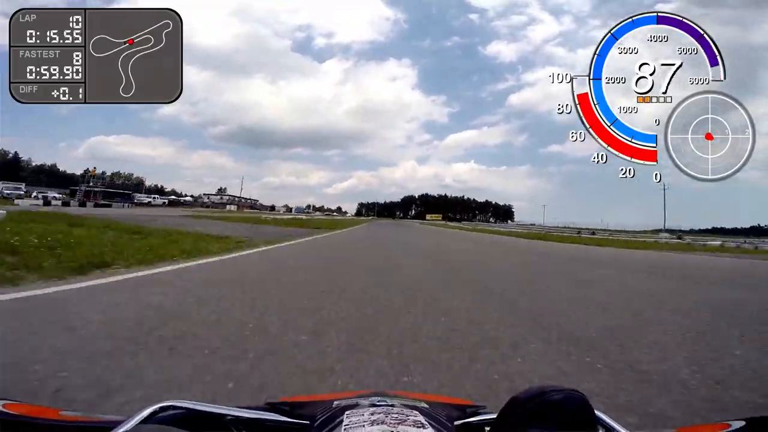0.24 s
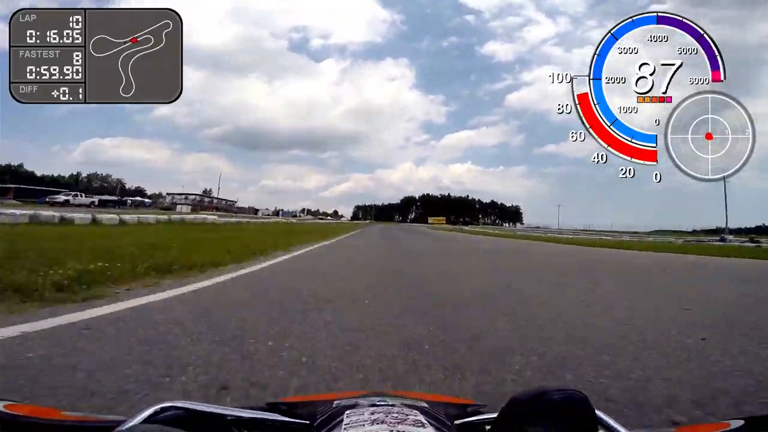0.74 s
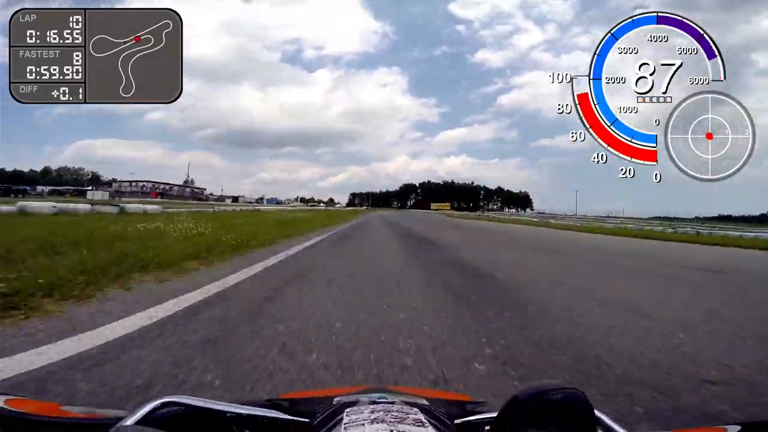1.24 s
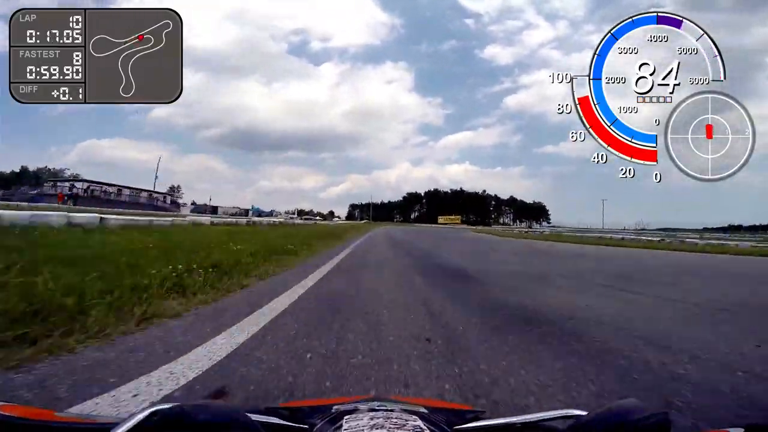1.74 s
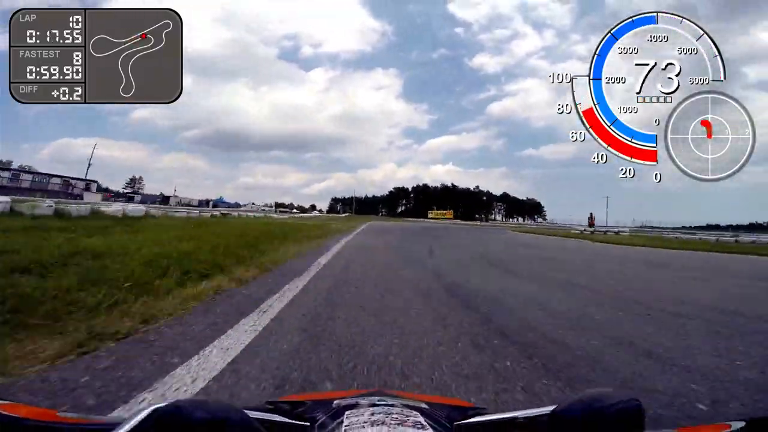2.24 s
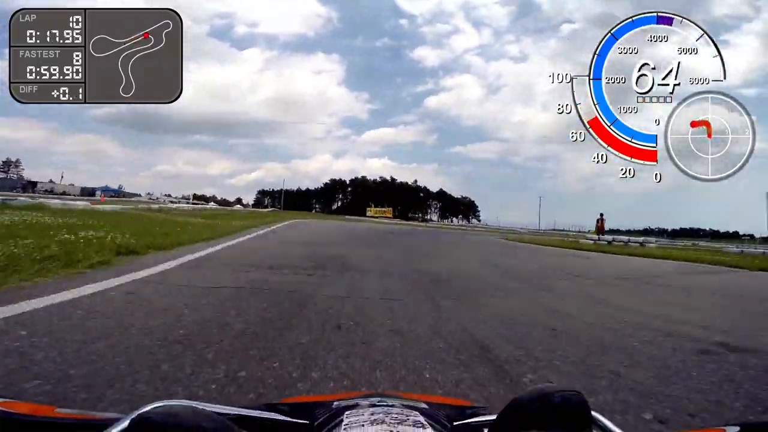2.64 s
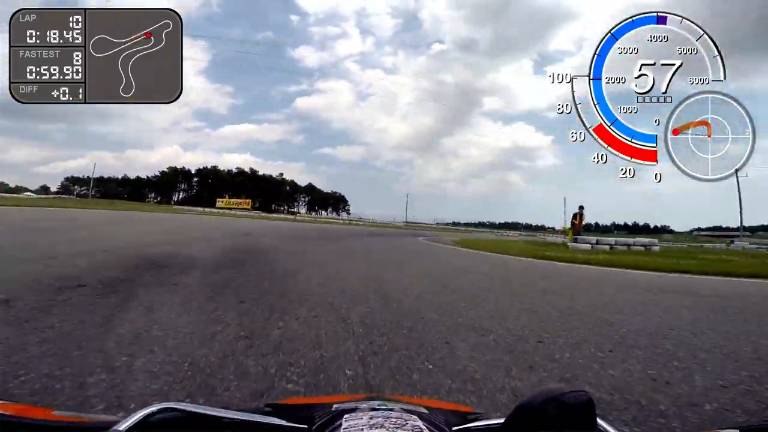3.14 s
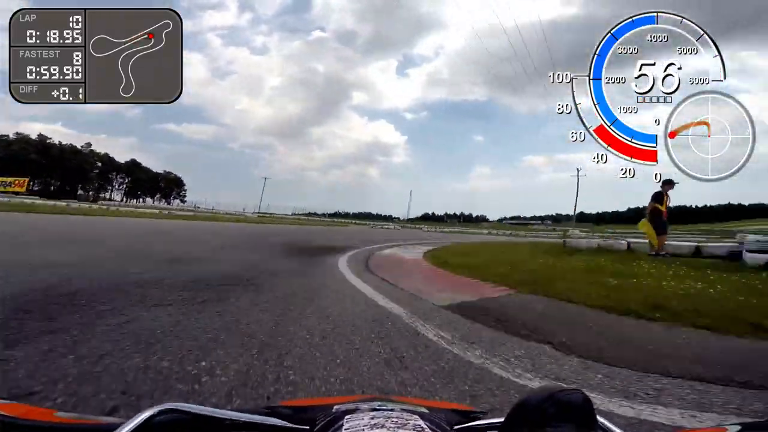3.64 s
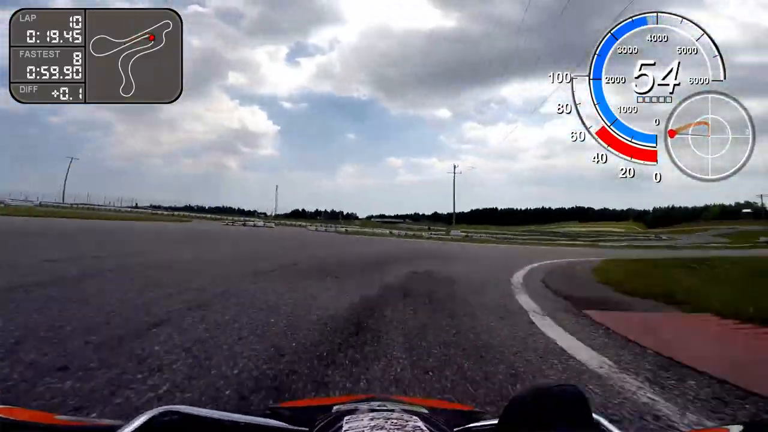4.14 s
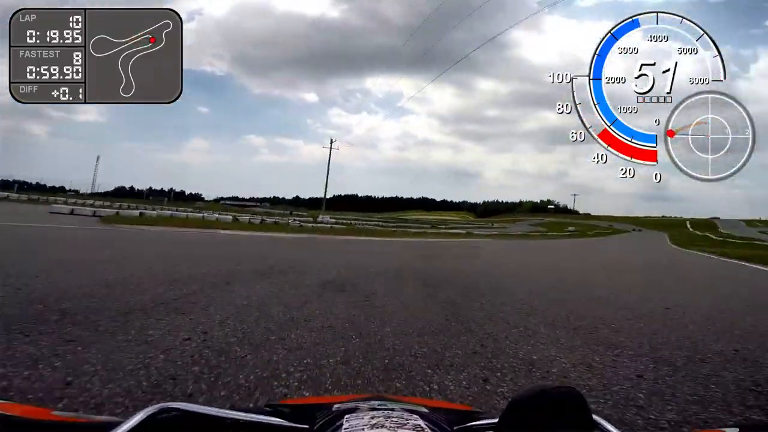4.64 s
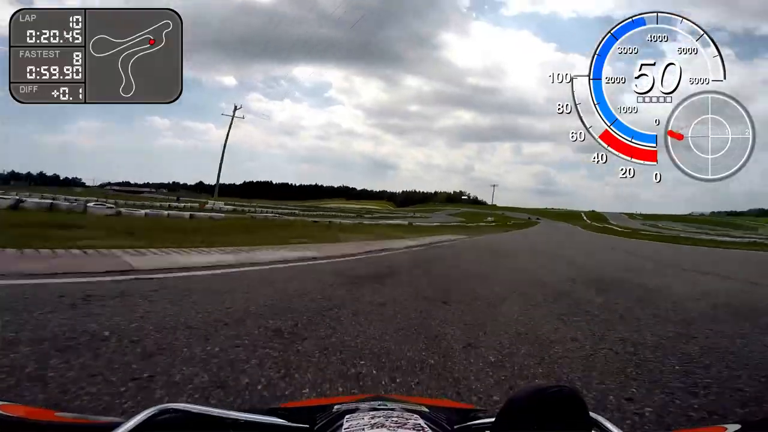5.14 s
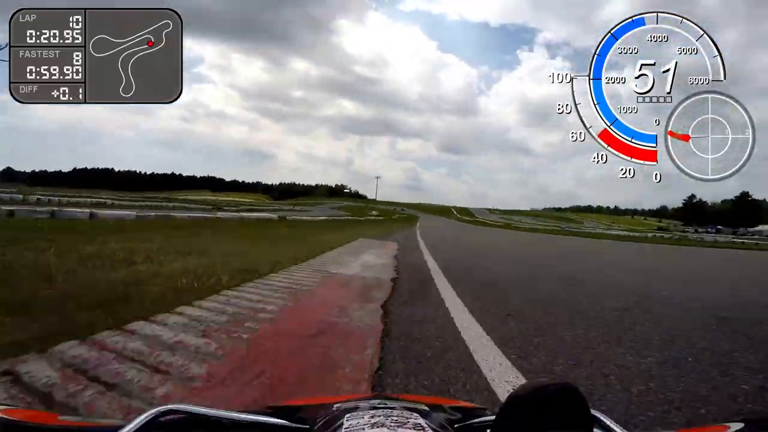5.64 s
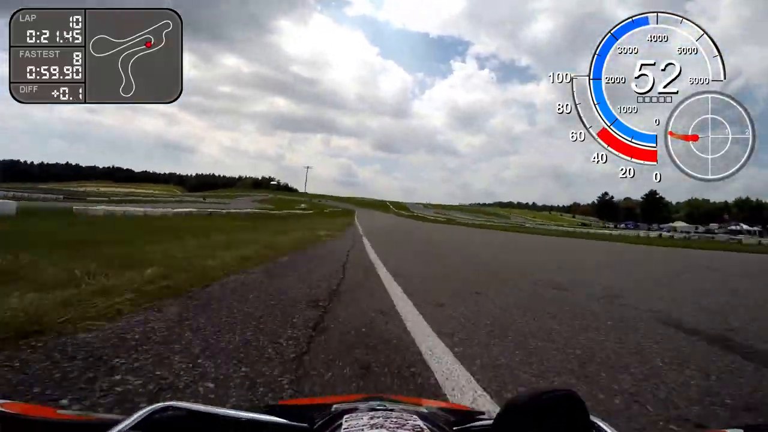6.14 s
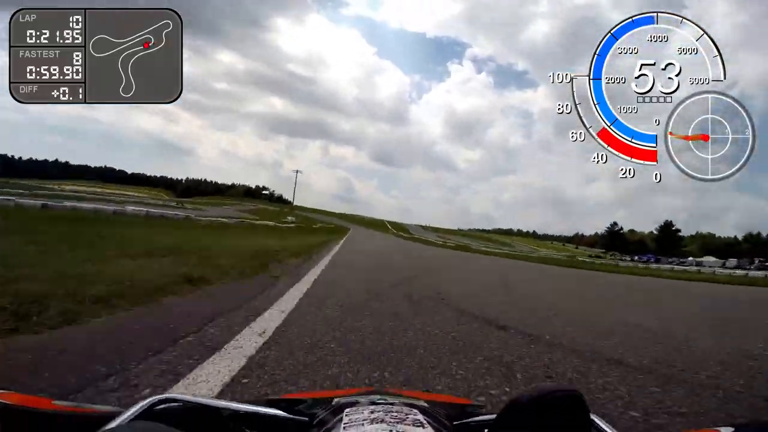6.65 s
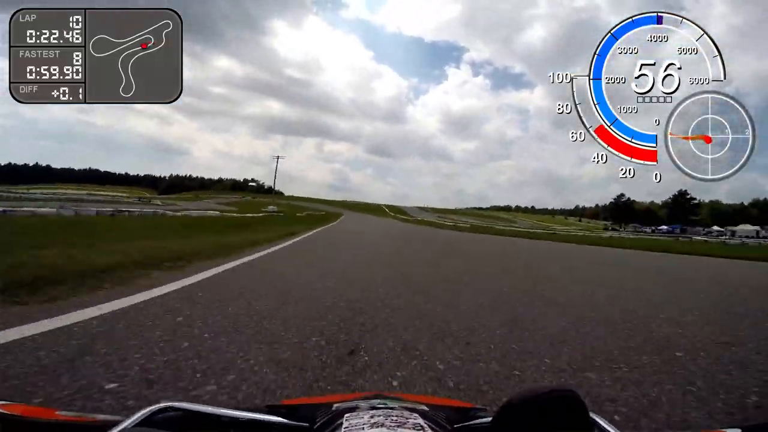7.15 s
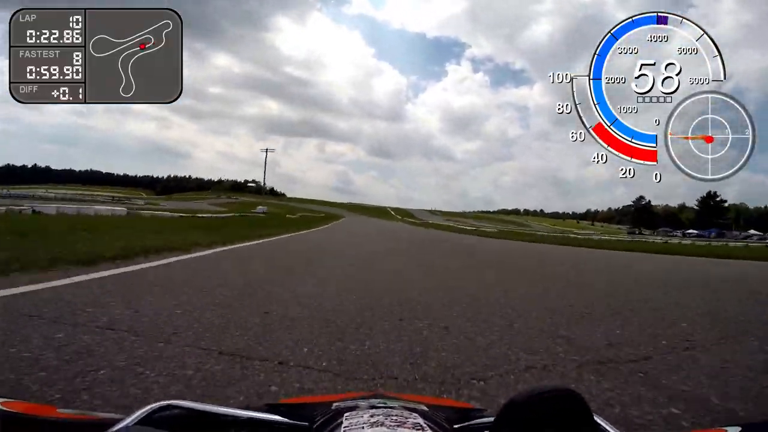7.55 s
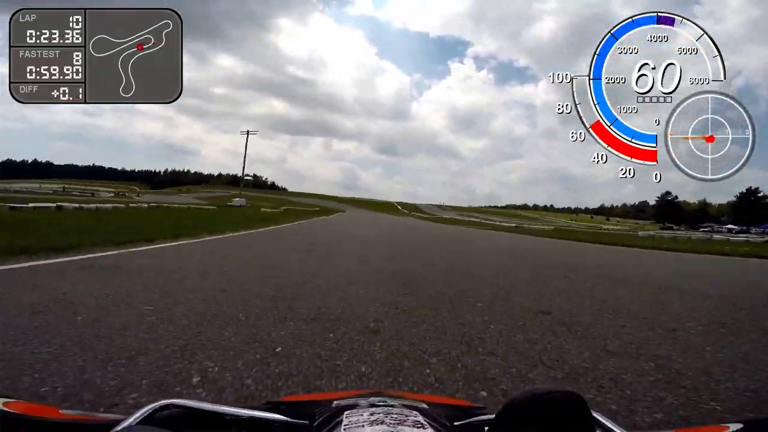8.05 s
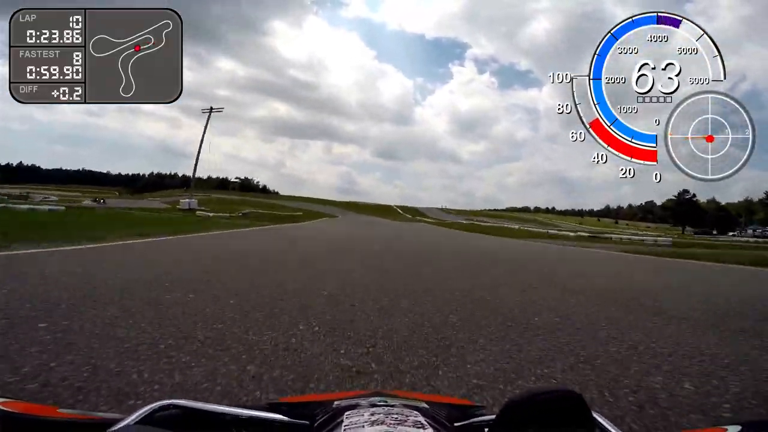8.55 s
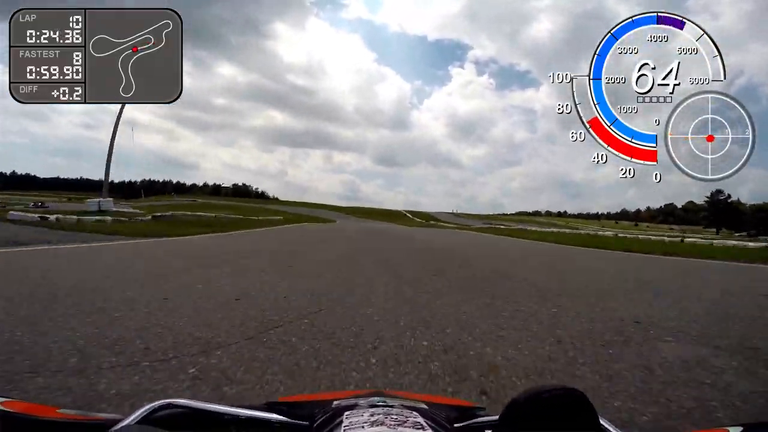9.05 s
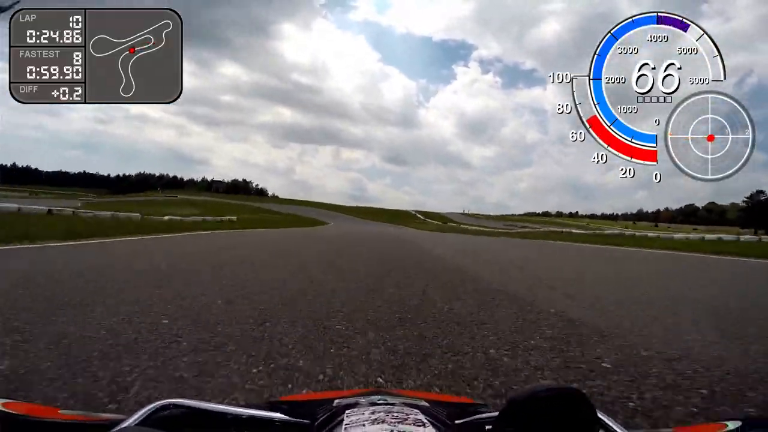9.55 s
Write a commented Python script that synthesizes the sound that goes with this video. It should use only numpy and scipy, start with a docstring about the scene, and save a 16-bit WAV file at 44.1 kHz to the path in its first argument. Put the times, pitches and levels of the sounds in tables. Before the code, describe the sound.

A small single-cylinder kart engine roars flat out, drops in pitch under rattling braking, drones through a squealing bend, drums over a kerb, then climbs again.

```python
"""A single-cylinder four-stroke kart, heard close up by a microphone in a case bolted to its frame.
It runs flat out, brakes for a bend, pulls through it, clips the kerb and gathers speed again.
The engine drones in harmonics of its firing rate and roars in puffs of noise; the frame bobs on the asphalt.
Noise and clicks through the resonances of the case make rattle, clatter and hiss; chain and brake ring too.
Frame and mount knock, stones tick on the case, and the tyres squeal, scrub, sizzle and drum over the kerb."""
import sys
import numpy as np
from scipy import signal
from scipy.fft import rfft, irfft
from scipy.io import wavfile
from scipy.ndimage import uniform_filter1d, minimum_filter1d

SR = 44100
rng = np.random.default_rng(int(sys.argv[2]) if len(sys.argv) > 2 else 0)


def dump(signal):
    """Clip the signal to [-1, 1] and save it as 16-bit WAV at the path in sys.argv[1]."""
    limited = np.clip(np.atleast_2d(signal).T, -1, 1)
    pcm = np.round(limited * 32767).astype(np.int16)
    wavfile.write(sys.argv[1], SR, pcm)


N = 432180
TIME = np.arange(N) / SR
BINS = np.fft.rfftfreq(8192, 1 / SR) + 1  # Hz, raised by 1 to keep clear of zero

ROAR_DB = -23  # at a shake of 0 dB, before the roar's own course
# resonances of the microphone's case: (frequency [Hz], width [Hz], relative level [dB])
CASE_MODES = [(651, 132, 10), (899, 49, 6.5), (1104, 95, 11), (1212, 150, 6.5), (1360, 150, 7),
              (1640, 110, -4), (2006, 450, -2), (2215, 87, -3.5), (2580, 376, -8), (2724, 170, -8),
              (3210, 170, -15.5), (3424, 170, -13), (3730, 200, -25.5), (4400, 520, -28.5),
              (5420, 600, -39.5), (5850, 250, -30), (6140, 290, -31.5), (6580, 460, -37), (7120, 810, -36),
              (8330, 500, -46), (9220, 900, -41), (10780, 1200, -48), (13000, 1700, -52)]
# tone of a knock, with a low body and two hollows: (frequency [Hz], relative level [dB])
KNOCK_TONE = [(150, -25.5), (330, 4.5), (460, 6.5), (640, 0.5), (880, -6), (1130, 1), (1380, 0),
              (1750, -15), (1950, -7), (2250, -8), (2700, -19), (3100, -24.5), (3450, -15.5), (3900, -36),
              (4500, -32.5), (6000, -48), (15000, -70)]


def gain_of(db):
    """Decibels to amplitude."""
    return 10 ** (np.asarray(db) / 20)


def evened(x):
    """Scales to rms 1."""
    return x / np.sqrt(np.mean(x ** 2) + 1e-20)


def curves(rows):
    """Each column of a table, joined by straight lines over time."""
    s, *columns = np.transpose(rows)
    return [np.interp(TIME, s, column) for column in columns]


def wander(hz):
    """Smooth chance of rms 1, fading out gently above about hz."""
    fade = np.exp(-(np.fft.rfftfreq(N, 1 / SR) / hz) ** 2)
    return evened(irfft(rfft(rng.standard_normal(N)) * fade, N))


def peaks(modes):
    """Gain over frequency of a set of steep-sided resonances."""
    powers = [gain_of(db) ** 2 / (1 + 2 * ((BINS - hz) / width) ** 2) ** 2 for hz, width, db in modes]
    return np.sqrt(sum(powers))


def band(low_hz, high_hz, order=6):
    """Gain over frequency of a band-pass."""
    return ((1 + (low_hz / BINS) ** (2 * order)) * (1 + (BINS / high_hz) ** (2 * order))) ** -.5


def coloured(points, stretch=1):
    """Gain over frequency from (Hz, dB) points, with all frequencies multiplied by stretch."""
    hz, db = np.transpose(points)
    return gain_of(np.interp(np.log(BINS), np.log(hz * stretch), db))


def ring(gain):
    """Causal (minimum-phase) impulse response with this gain over frequency."""
    log_gain = np.log(np.maximum(gain / gain.max(), 1e-5))
    circle = np.r_[log_gain, log_gain[-2:0:-1]]
    return np.fft.ifft(np.exp(np.conj(signal.hilbert(circle)))).real[:len(gain)]


def through(drive, gain):
    """What a drive makes of a resonant body, at rms 1."""
    return evened(signal.oaconvolve(drive, ring(gain))[:N])


def bursts(turns, at, length, uneven_db):
    """One swell a cycle, from the share 'at' of it to a peak 'length' later; sizes vary, softly capped."""
    cycle, age = np.divmod(turns - at + 2, 1)
    size = 2 * np.tanh(gain_of(uneven_db * rng.standard_normal(N)) / 2)
    return size[cycle.astype(int)] * age / length * np.exp(1 - age / length)


def taps(per_s):
    """Random clicks of uneven size, at rms 1."""
    return evened(rng.uniform(-0.71, 1, N) * (rng.random(N) < per_s / SR))


def dispersed(x, lag_s):
    """Bending waves in a tube: treble arrives first, 1 kHz lag_s after 4 kHz, so a blow chirps downwards."""
    hz = np.fft.rfftfreq(len(x), 1 / SR)
    delay = lag_s * np.maximum(np.sqrt(4000 / np.maximum(hz, 400)) - 1, 0)
    phase = 2 * np.pi * np.cumsum(delay) * SR / len(x)
    return irfft(rfft(x) * np.exp(-1j * phase), len(x))


def spell(start, end, fade_s):
    """1 between start and end, 0 outside, with sloping edges."""
    return np.clip(np.minimum(TIME - start, end - TIME) / fade_s + .5, 0, 1)


def spells(rows, fade_s):
    """Gain of a sound that comes and goes."""
    return sum(gain_of(db) * spell(start, end, fade_s) for start, end, db in rows)


def lulls():
    """dB lost in the lulls, in which roar and rattle drop away."""
    # (start [s], end [s], change [dB])
    lull_rows = [(0.874, 1.074, -2), (4.16, 4.348, -4), (6.736, 6.99, -8), (9.443, 9.606, -4.5)]
    return sum(db * spell(start, end, fade_s=0.054) for start, end, db in lull_rows)


def shaking():
    """dB of shaking: its slow course, a swell or dip on each patch of asphalt, and the lulls."""
    # how hard the kart shakes on the asphalt: (time [s], level [dB])
    slow_course = [(0, 4.5), (1, 1), (1.5, 1), (2.1, -0.9), (3.05, 1), (3.8, 6), (4.5, 6), (5.5, 4.5),
                   (6.45, 0), (7.1, 1.2), (7.85, -3.5), (8.7, 0), (9.2, -3.5), (9.8, 4.5)]
    # patches of asphalt: (middle [s], length [s], change [dB])
    patches = [(0.789, 0.028, 4.5), (1.106, 0.056, 2.5), (1.726, 0.41, 4), (2.675, 0.057, 9),
               (2.875, 0.11, 3), (3.282, 0.075, -4.5), (4.127, 0.077, 6.5), (4.451, 0.059, 2),
               (5.06, 0.091, 3), (5.2, 0.11, 2.5), (5.574, 0.11, 4), (6.634, 0.061, 1), (7.543, 0.18, 6),
               (7.74, 0.21, 4), (8.064, 0.31, 6), (8.38, 0.23, 3.5), (8.783, 0.17, 3), (9.003, 0.24, 5),
               (9.367, 0.15, 4.5), (9.697, 0.21, 0.5)]
    swells = sum(db * np.exp(-(2 * (TIME - s) / length) ** 2) for s, length, db in patches)
    return curves(slow_course)[0] + swells + lulls()


def drone(speed, turns, shake_db, coast, bend, straight):
    """Clean engine orders sweep through the resonances of the frame, wavering as the firings vary."""
    # engine load, shut for braking and eased at the exit of the bend: (time [s], level [dB])
    load_rows = [(0, 4.5), (1.58, 0), (1.75, -20), (2.05, -39), (2.5, -11.5), (2.7, -3), (4.8, -3.5),
                 (5.6, -5), (6.2, -9.5), (6.7, -6), (7.1, -1), (9.8, 5.5)]
    # how the frame answers a steady shake: (frequency [Hz], level [dB])
    frame_answer = [(60, -21.5), (73, -21), (82, -33.5), (92, -10), (101, -25), (108, -28.5), (114, -21),
                    (124, -30.5), (140, -46.5), (153, -22), (167, -22), (183, -26.5), (191, -32.5),
                    (201, -25.5), (222, -29.5), (260, -41.5)]
    # weaker multiples of the firing rate, which follow the shaking: (order, level relative to ROAR_DB [dB])
    overtones = [(8, -18.5), (9, -22.5), (10, -25), (11, -20.5), (12, -19.5), (13, -27), (14, -30),
                 (15, -23)]
    # strong multiples of the firing rate: (order, level [dB], share of the load that it follows)
    strong_orders = [(2, 0, 1), (3, -9, 1), (4, -2.5, 0.046), (5, -0.5, 0.45), (6, -2, 0.064),
                     (7, 0.5, 0.018)]
    # moments when one order booms out: (start [s], end [s], order, gain [dB])
    booms = [(-.1, .3, 3, 7), (0.263, 0.54, 4, 9), (1.254, 1.72, 4, 1.5), (1.72, 1.938, 4, 12),
             (4.3, 4.954, 3, 5.5), (6.48, 6.69, 5, 5), (7, 7.377, 5, 6.5), (7.55, 8.05, 5, 4.5),
             (7.2, 8.2, 7, 7), (8.05, 8.9, 5, 1.5), (8.55, 9.05, 3, 5), (8.7, 9.9, 7, 11.5)]
    top_hz = 563  # the case muffles the weaker multiples above this
    load_db, = curves(load_rows)
    hz, frame_db = np.transpose(frame_answer)
    dip_db = lulls()
    upper_db = -8 * coast - 5 * bend  # coasting and the bend weaken the orders that follow the load little
    overtone_db = ROAR_DB + shake_db + 5 * straight
    orders = []
    for k, db in overtones:
        muffle_db = 10 * np.log10(1 + (k * speed / top_hz) ** 12)
        orders.append((k, overtone_db + db - muffle_db))
    for k, db, share in strong_orders:
        answer_db = np.interp(k * speed, hz, frame_db)
        boom_db = sum(rise * spell(start, end, fade_s=0.14) for start, end, order, rise in booms if order == k)
        pull_db = share * load_db + (1 - share) * upper_db
        orders.append((k, db + answer_db + boom_db + dip_db + pull_db))
    out = np.zeros(N)
    for k, db in orders:
        level = np.sqrt(2) * gain_of(db + wander(7))
        out += level * np.cos(2 * np.pi * (k * turns + rng.random()) + .1 * wander(6))
    return out


def roar(turns, grip, shake_db, coast, bend, straight):
    """Exhaust and intake each puff turbulently once a cycle, dulled by the case; the airbox booms along."""
    # tone of the roar: (frequency [Hz], relative level [dB])
    roar_tone = [(25, -40.5), (62, -9.5), (90, 0), (125, -7), (165, 1.5), (220, 1), (265, -2), (325, 1.5),
                 (430, -4.5), (560, -9), (680, -20.5), (800, -26), (1100, -25), (2500, -80)]
    # level of the exhaust roar against the shaking: (time [s], level [dB])
    roar_course = [(0, 0.5), (2.15, -1), (2.45, 1.5), (2.7, 0.5), (3.35, 0.5), (3.75, -0.3), (4.5, -3),
                   (5.7, 0.5), (6.2, 1), (6.7, -0.5), (7.3, 2), (8.1, 2), (8.75, 2), (9.1, 0.5), (9.8, 0.5)]
    exhaust_puffs = 0.5 * bursts(turns, at=0.045, length=0.15, uneven_db=-8.5)
    intake_puffs = 0.37 * bursts(turns, at=0.58, length=0.17, uneven_db=0.0)
    puffs = 2.5 + exhaust_puffs + intake_puffs
    exhaust = through(puffs * gain_of(1.78 * grip) * rng.standard_normal(N), coloured(roar_tone))
    exhaust = gain_of(curves(roar_course)[0]) * exhaust
    airbox_modes = [(177.8, 29.0, 0.0), (229.6, 40.0, -7.5), (101.0, 73, -10)]  # (Hz, width Hz, dB)
    airbox = through(puffs * rng.standard_normal(N), peaks(airbox_modes))
    airbox_db = -2 - 28 * coast - 1.5 * bend - 2.5 * straight
    return gain_of(ROAR_DB + shake_db) * (exhaust + gain_of(airbox_db) * airbox)


def bounce(shake_db, coast, bob_hz=39):
    """The unsprung frame bobs on its tyres, nudged by the road, and most evenly while the kart coasts."""
    sway = np.sin(2 * np.pi * bob_hz * TIME + wander(4))
    road = through(rng.standard_normal(N), band(31.5, 45.2, order=5))
    bob = evened((1 + 0.45 * coast) * sway + 0.62 * (1 - 0.45 * coast) * road)
    # the slow bounce swells when the shaking is quiet and sinks when it is loud
    level_db = -16.5 - 0.74 * uniform_filter1d(shake_db, size=8000)
    return gain_of(level_db) * bob


def cased(drive, flex, low_hz, high_hz):
    """A drive heard through one band of the case, whose resonances sag as it flexes (0-1)."""
    def answer(shift):
        modes = [(hz * (1 + shift), width, db) for hz, width, db in CASE_MODES]
        return through(drive, peaks(modes) * band(low_hz, high_hz))
    tight, slack = answer(0.006), answer(-0.006)
    return evened((1 - flex) * tight + flex * slack)


def mechanics(speed, turns, grip, shake_db, coast, bend):
    """Rattle, valve clatter and exhaust hiss all sound through the resonances of the case."""
    # extra rattle of the mount, greatest under braking: (time [s], level [dB])
    strain_rows = [(0, 4), (1.5, 2.5), (1.7, 6.5), (2.3, 5.5), (3.4, 3.5), (4.8, -3.5), (5.6, -0.5),
                   (6.2, 2), (9.8, 4.5)]
    # level of the treble, higher on the straights: (time [s], level [dB])
    treble_rows = [(0, 8.5), (1.4, 5.5), (1.8, 3.5), (2.8, 5), (4.1, 0), (5.4, 2.2), (6.7, 4.5), (7.15, 7),
                   (8.6, 7.5), (9.3, 8), (9.8, 11)]
    strain_db, treble_db = curves(strain_rows)[0], curves(treble_rows)[0]
    rattle_db = -38.5 + shake_db + strain_db - 2.5 * coast
    clatter_db = -41.5 + 0.89 * shake_db + 0.46 * strain_db + 0.31 * treble_db - 2.5 * coast
    hiss_db = -54 + 0.92 * shake_db + treble_db - 1.8 * coast

    flex = np.clip(bend + 0.35 * wander(0.8), 0, 1)
    grit = gain_of(2.11 * grip) * rng.standard_normal(N)
    # separate taps stand out from the even grit of the mount, more so when coasting
    chatter = (0.28 + 0.44 * coast) * dispersed(taps(per_s=130), lag_s=0.00126)
    # firing rates above which the exhaust puffs begin to merge, and at which they are an even hiss
    merge_from_hz, merged_hz = 32.6, 53
    distinct = np.clip((merged_hz - speed) / (merged_hz - merge_from_hz), 0, 1) * (1 - coast)
    exhaust = distinct * bursts(turns + .16 * bend, at=.21, length=.12, uneven_db=1.5) ** 2
    valves = 1.33 * bursts(turns, at=0.99, length=0.034, uneven_db=9.0)
    valves += 0.59 * bursts(turns, at=0.805, length=0.027, uneven_db=18.0)

    rattle = cased((grit + chatter) * (1 + .5 * exhaust), flex, low_hz=670, high_hz=2197)
    clatter_drive = (grit + 0.57 * chatter) * (1 + 0.35 * valves + 0.23 * exhaust)
    clatter = cased(clatter_drive, flex, low_hz=2240, high_hz=3260)
    puffed = grit * (1 + .4 * (1 - distinct) + 1.3 * exhaust)
    hiss = cased(puffed, flex, low_hz=3920, high_hz=17000)
    return gain_of(rattle_db) * rattle + gain_of(clatter_db) * clatter + gain_of(hiss_db) * hiss


def chain(turns, rest_db=-73):
    """Links rasp over the sprocket in flurries, hardest when the crank tugs, twice a cycle."""
    # spells in which the chain rings, over a faint steady rasp: (start [s], end [s], level [dB])
    chain_spells = [(-0.2, 0.75, -46), (0.75, 1.65, -51), (7.03, 7.55, -56), (7.98, 8.1, -53),
                    (8.45, 8.85, -50), (9.62, 10, -48)]
    # resonances of the chain drive: (frequency [Hz], width [Hz], relative level [dB])
    chain_modes = [(4575, 190, 7), (4830, 200, -16.5)]
    flurries = gain_of(9 * np.tanh(.6 * wander(70)))
    tugs = -0.5 + 2.0 * bursts(2 * turns, at=0.074, length=0.1, uneven_db=-0.5)
    rasp = through(flurries * rng.standard_normal(N) * tugs, peaks(chain_modes))
    return (gain_of(rest_db) + spells(chain_spells, fade_s=.15)) * rasp


def brake(turns, sing_db=-63, flutter_db=1):
    """The disc's lowest mode sings thinly; biting pads rasp the upper ones at each turn of the crank."""
    # resonances of the brake disc, lowest first: (frequency [Hz], width [Hz], relative level [dB])
    disc_modes = [(4470, 49, -1.5), (5900, 580, -12), (7150, 600, -20), (8240, 160, -17), (8900, 160, -20),
                  (9350, 300, -27), (10500, 160, -27), (13000, 220, -28)]
    # the disc sings louder as the pads take hold and as they let go: (start [s], end [s], level [dB])
    sing_spells = [(1.62, 1.92, -58), (2.26, 2.63, -62)]
    # the pads bite hard, then trail off: (start [s], end [s], level [dB])
    bite_spells = [(1.8, 2.24, -55.5), (2.24, 2.95, -73)]
    rubs = rng.standard_normal(N) * bursts(2 * turns, at=0.41, length=.1, uneven_db=12)
    rasp = through(rubs, peaks(disc_modes[1:]))
    sing = through(gain_of(flutter_db * wander(17)) * rng.standard_normal(N), peaks(disc_modes[:1]))
    sing_level = gain_of(sing_db) + spells(sing_spells, fade_s=.06)
    return sing_level * sing + spells(bite_spells, fade_s=.12) * rasp


def struck(body, scuff, scuff_s, lag_s=0):
    """A sharp blow and a brief scuff on a ringing body, at rms 1 in its loudest millisecond."""
    age = TIME[:len(body)]
    blow = (age == 0) + scuff * rng.standard_normal(len(age)) * np.exp(-age / scuff_s)
    sound = dispersed(signal.fftconvolve(blow, body)[:len(age)], lag_s)
    return sound / np.sqrt(uniform_filter1d(sound ** 2, size=44).max())


def knocks():
    """The shaken frame and mount knock, chirping downwards, each with its own tone; stones tick on the case."""
    # knocks, often one to an engine cycle: (time [s], loudest-millisecond level [dB])
    frame_knocks = [(1.6358, -22), (1.6494, -19), (1.6545, -18), (1.6696, -21), (1.6914, -10.5),
                    (1.719, -13.5), (1.7322, -13), (1.7577, -17), (1.7709, -14), (1.792, -23),
                    (1.8063, -13.5), (1.8148, -15), (1.8318, -17), (1.931, -10), (2.0073, -13.5),
                    (2.1216, -20), (2.174, -18), (2.1863, -23), (2.201, -24), (2.2723, -16.5),
                    (2.2892, -18), (2.3096, -11), (2.3587, -11), (2.4012, -25), (2.4264, -26),
                    (2.4389, -18), (2.4855, -14.5), (2.509, -22), (2.5321, -21), (2.8853, -12),
                    (2.904, -16.5), (2.945, -16.5), (3.02, -21.5), (3.218, -16), (3.2445, -18.5),
                    (3.2714, -13.5), (3.3007, -20), (3.494, -19), (3.986, -17), (4.4799, -11), (4.486, -17),
                    (4.767, -23), (5.0014, -16), (5.0315, -18.5), (5.0627, -19), (5.1617, -27),
                    (5.195, -24), (5.227, -18), (5.3507, -27), (5.3836, -18), (5.4215, -22), (5.4777, -22),
                    (5.5423, -16.5), (5.5517, -19), (5.6062, -17.5), (5.6376, -19), (5.653, -17.5),
                    (5.68, -14.5), (5.7171, -16), (5.907, -17.5), (5.9404, -23), (5.9643, -23),
                    (5.9901, -22), (6.5176, -17.5), (8.9257, -19.5)]
    # small stones against the case: (time [s], loudest-millisecond level [dB])
    stones = [(1.2595, -29), (1.3683, -26), (1.9305, -32), (2.3092, -32), (2.358, -21), (4.214, -33),
              (4.4797, -38), (5.6824, -23), (5.908, -40), (6.4537, -30), (6.5166, -33), (6.6468, -36),
              (6.7032, -37), (7.043, -28), (7.0736, -30), (8.0346, -26), (8.9258, -24)]
    out = np.zeros(N)
    tick = ring(peaks(CASE_MODES) * band(5000, 8500, order=3))
    for s, db in frame_knocks:
        stretch, tilt, lag_s = rng.uniform([.96, -.1, .001], [1.04, .3, .0017])
        thud = ring(coloured(KNOCK_TONE, stretch) * BINS ** tilt)
        out[round(s * SR):][:len(thud)] += gain_of(db) * struck(thud, scuff=.06, scuff_s=.004, lag_s=lag_s)
    for s, db in stones:
        out[round(s * SR):][:len(tick)] += gain_of(db) * struck(tick, scuff=0.41, scuff_s=0.0024)
    return out


def crackle(turns, at=0.1, rebound=0.45, stray=0.35):
    """The strained mount knocks at each firing, rebounds half a cycle later and clicks at random between."""
    # runs of small knocks between the big ones: (start [s], end [s], level [dB])
    crackle_spells = [(1.62, 1.86, -31), (2.03, 2.56, -32.5), (3.3, 4.2, -36.5), (4.2, 5, -33),
                      (5, 5.8, -32)]
    # count of half cycles, unevenly timed but never running back
    half = np.maximum.accumulate(np.floor(2 * (turns - at + .06 * wander(40))))
    blows = np.diff(half, prepend=half[0]) * np.where(half % 2, rebound, 1) * rng.uniform(.4, 1, N)
    drive = dispersed(evened(blows) + stray * taps(per_s=110), lag_s=0.0012)
    return spells(crackle_spells, fade_s=.04) * through(drive, coloured(KNOCK_TONE))


def squeal(waver=0.018, width_hz=90):
    """Tread of the loaded front tyres sticks and slips hoarsely at an unsteady pitch."""
    # on the way to the apex: (start [s], end [s], level [dB])
    squeal_spells = [(3.33, 4.15, -36)]
    # course of the pitch, before its waver: (time [s], frequency [Hz])
    pitch_rows = [(3.33, 1320), (3.42, 1301), (3.5, 1117), (3.6, 1270), (3.72, 1110), (3.85, 1294),
                  (3.95, 1130), (4.15, 1155)]
    pitch_hz = curves(pitch_rows)[0] * (1 + waver * wander(25.2))
    phase = 2 * np.pi * np.cumsum(pitch_hz) / SR
    hoarse = wander(width_hz) * np.cos(phase) + wander(width_hz) * np.sin(phase)
    return spells(squeal_spells, fade_s=0.22) * evened(hoarse)


def tyres():
    """Rubber scrubs when it slides, sizzles over the surface in a high band, and throws up grit."""
    # scrub from the apex to the exit of the bend: (start [s], end [s], level [dB])
    scrub_spells = [(3.7, 4.95, -39), (4.98, 5.72, -44)]
    # thin sizzle along the kerb, and again at speed: (start [s], end [s], level [dB])
    sizzle_spells = [(6.06, 6.41, -53), (9.56, 10, -54)]
    # left wheels on the gritty edge of the track: (start [s], end [s], level [dB])
    gravel_spells = [(6.08, 6.72, -43.5)]
    scrub = through(gain_of(3 * wander(60)) * rng.standard_normal(N), band(700, 980, order=4))
    sizzle = through(rng.standard_normal(N), peaks([(5870, 350, 1.0), (5900, 300, 5), (7000, 540, -5)]))
    gravel = through(taps(per_s=200), peaks([(2620, 330, 4), (3770, 420, -10.0)]))
    out = spells(scrub_spells, fade_s=0.054) * scrub + spells(sizzle_spells, fade_s=.08) * sizzle
    return out + spells(gravel_spells, fade_s=0.05) * gravel + squeal()


def kerb(ribs_hz=146):
    """Evenly spaced ribs under the left wheels give the frame a short, rough hum."""
    # drumming over the ribs: (start [s], end [s], level [dB])
    kerb_spells = [(5.8, 6.08, -20.5)]
    hum = np.sin(2 * np.pi * ribs_hz * TIME + .6 * wander(12))
    return spells(kerb_spells, fade_s=0.037) * evened(hum)


def scene():
    """Everything on the kart: the engine cycle times it, and the shaking swells much of it."""
    # engine speed: (time [s], firing rate [Hz])
    speed_rows = [(0, 50.4), (.5, 50.02), (1.5, 50.05), (1.8, 45.7), (2, 40), (2.2, 37.4), (2.6, 34.15),
                  (2.8, 36.13), (3.3, 36.18), (4.25, 32.02), (4.5, 31.96), (5, 29.85), (5.4, 31.24),
                  (6.25, 31.18), (7, 32.95), (8, 35.44), (9, 37.64), (9.8, 38.83)]
    speed, = curves(speed_rows)
    turns = np.cumsum(speed) / SR  # engine cycles so far
    shake_db = shaking()
    coast = spell(start=1.99, end=2.57, fade_s=0.056)  # throttle shut
    bend = spell(start=3.25, end=5.87, fade_s=0.42)  # the kart leans through the bend
    straight = spell(start=7.6, end=10.2, fade_s=0.2)  # the engine pulls cleanly
    # the mount grips and slips, passing more or less of the exhaust roar and the grit
    grip = evened(wander(100) + 0.12 * wander(28.0))
    engine = drone(speed, turns, shake_db, coast, bend, straight)
    engine += roar(turns, grip, shake_db, coast, bend, straight)
    engine += mechanics(speed, turns, grip, shake_db, coast, bend)
    chassis = bounce(shake_db, coast) + gain_of(lulls()) * (chain(turns) + brake(turns))
    chassis += knocks() + crackle(turns) + tyres() + kerb()
    return (engine + chassis)[None]


def record(dry, ceiling_db=-1, edge_hz=15000):
    """A limiter holds the peaks down; then soft ends and the band limit."""
    allowed = np.minimum(1, gain_of(ceiling_db) / (abs(dry[0]) + 1e-9))
    gain = uniform_filter1d(minimum_filter1d(allowed, size=500), size=500)
    ends = signal.windows.tukey(N, .0006)
    low_pass = signal.firwin(511, edge_hz, window=("kaiser", 9), fs=SR)
    return signal.oaconvolve(dry * gain * ends, low_pass[None], "same")


dry = scene()
out = record(dry)
dump(out)
```